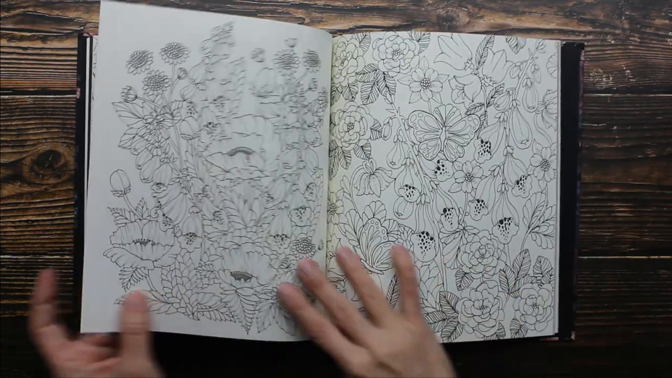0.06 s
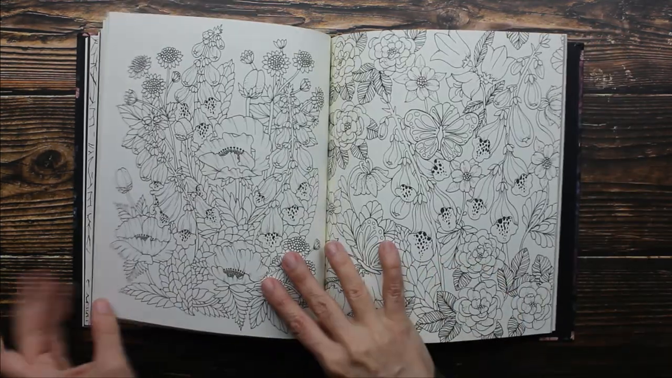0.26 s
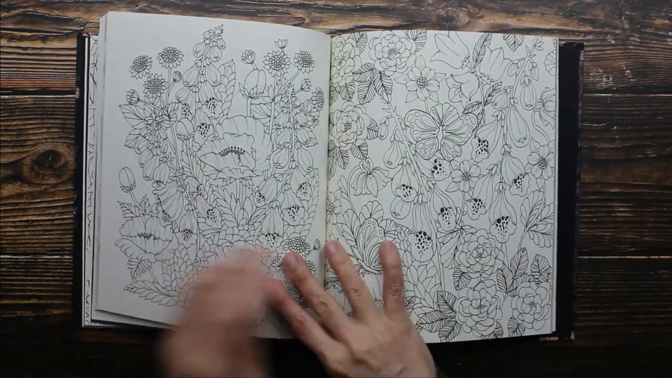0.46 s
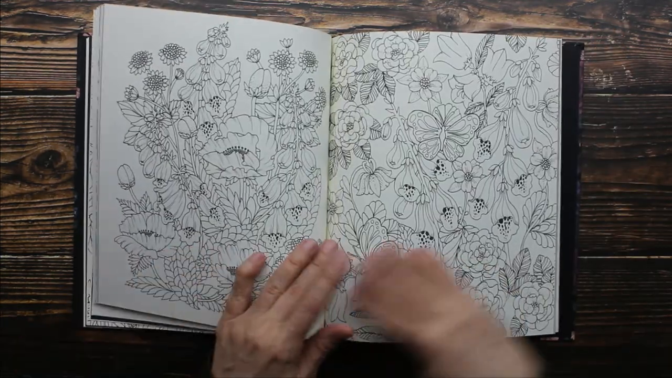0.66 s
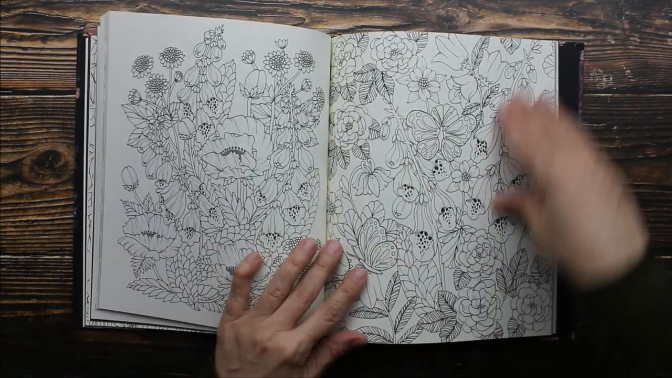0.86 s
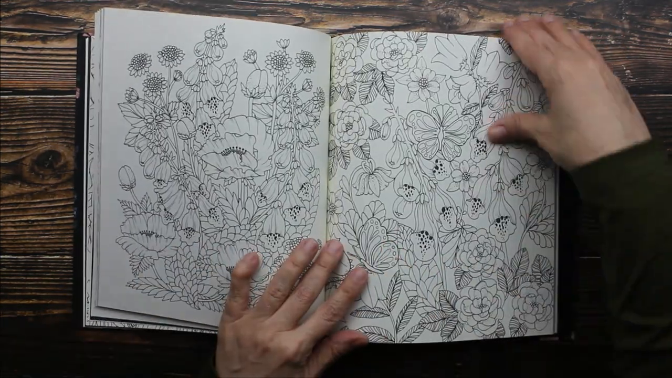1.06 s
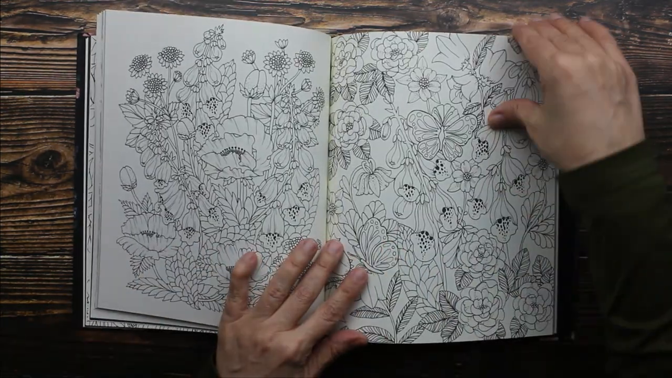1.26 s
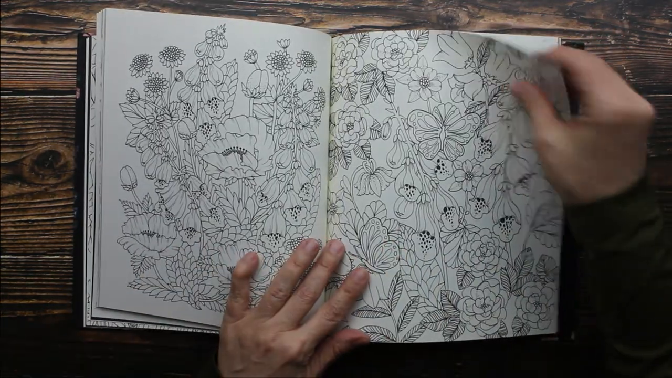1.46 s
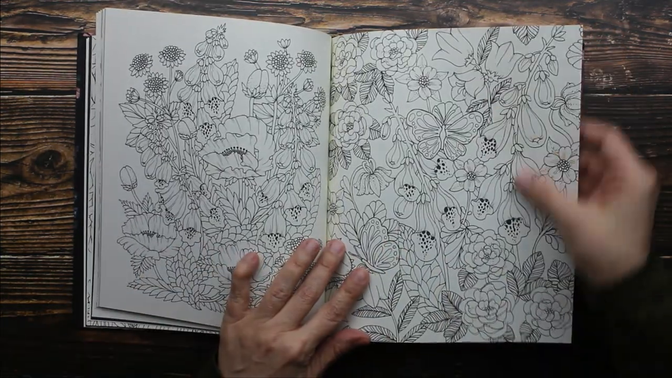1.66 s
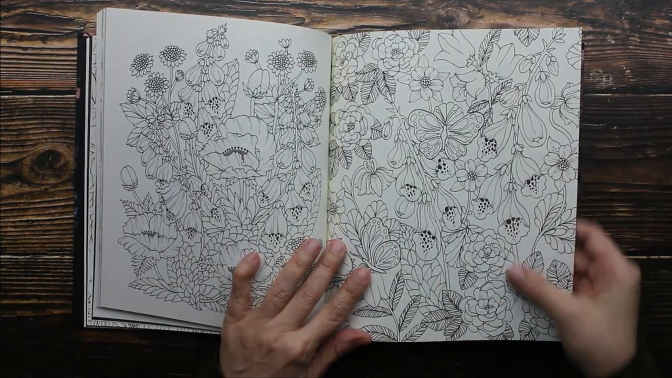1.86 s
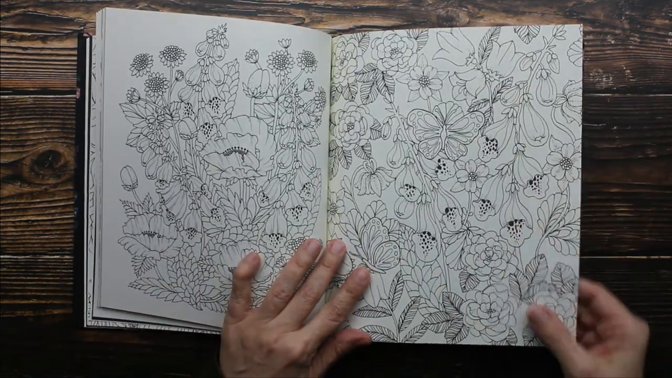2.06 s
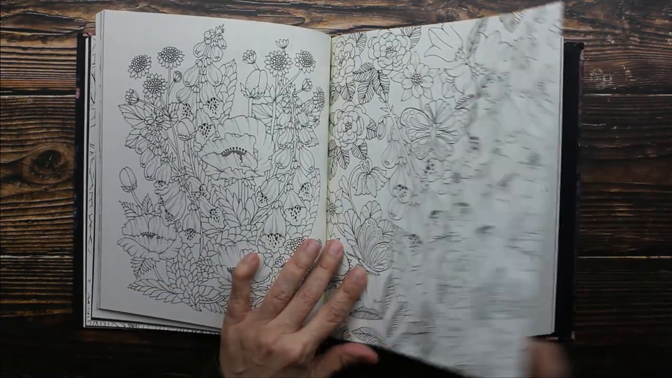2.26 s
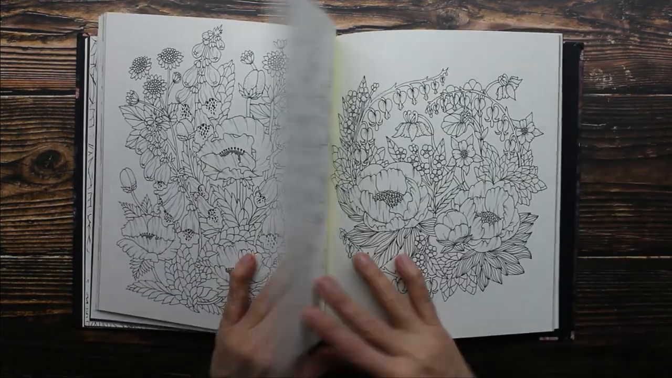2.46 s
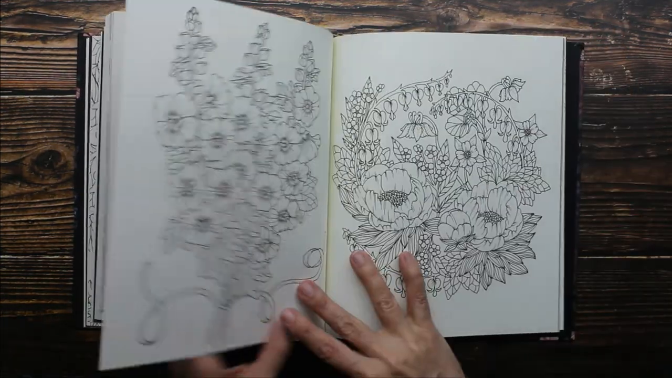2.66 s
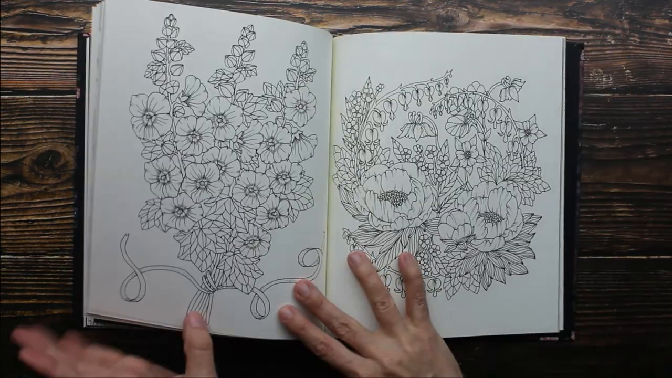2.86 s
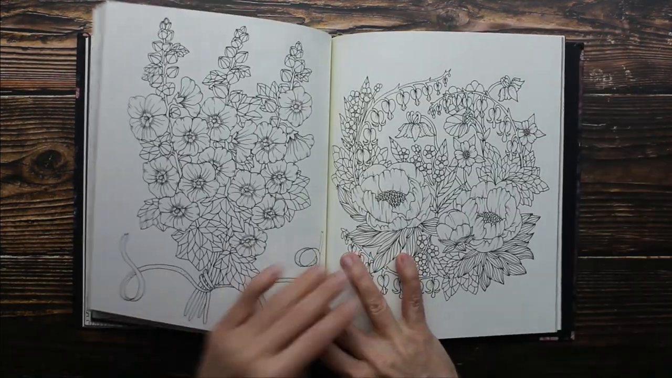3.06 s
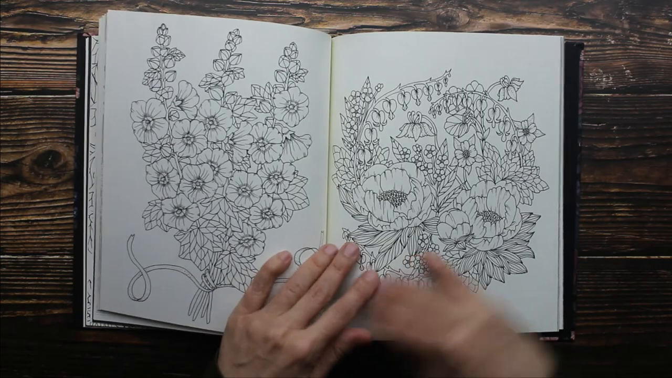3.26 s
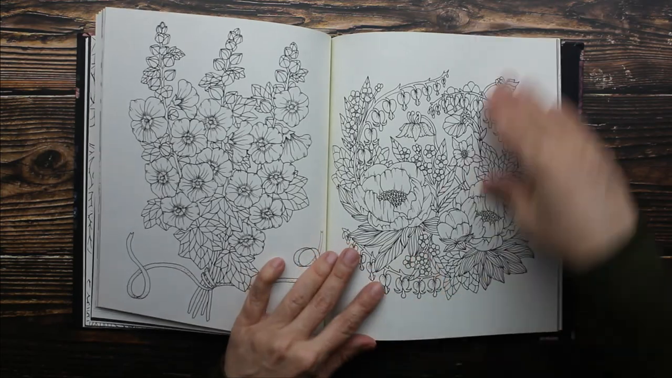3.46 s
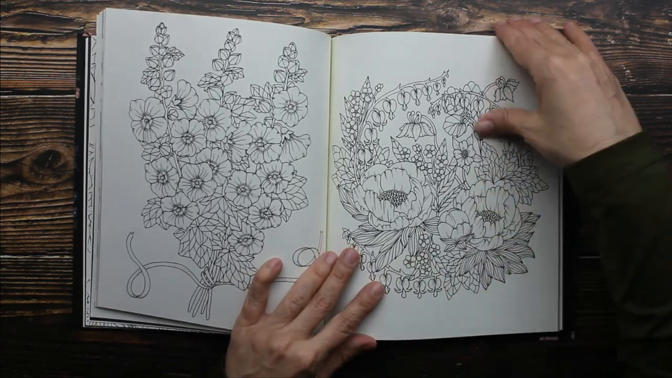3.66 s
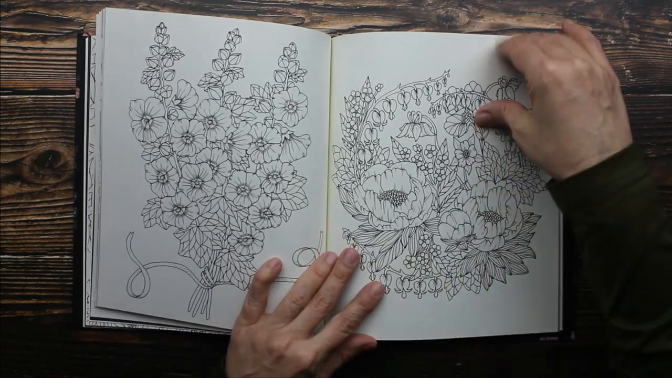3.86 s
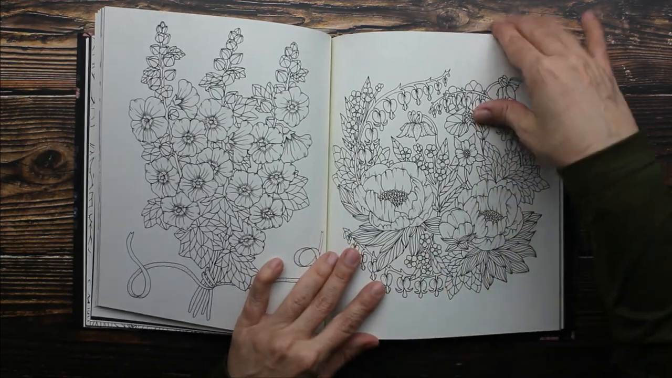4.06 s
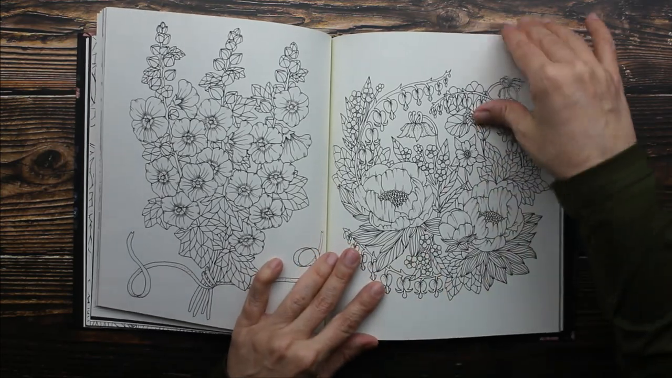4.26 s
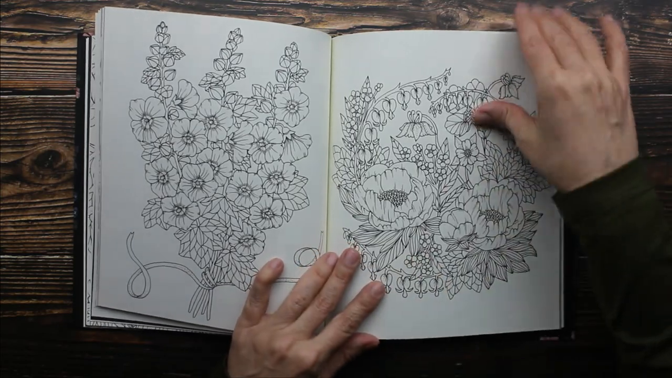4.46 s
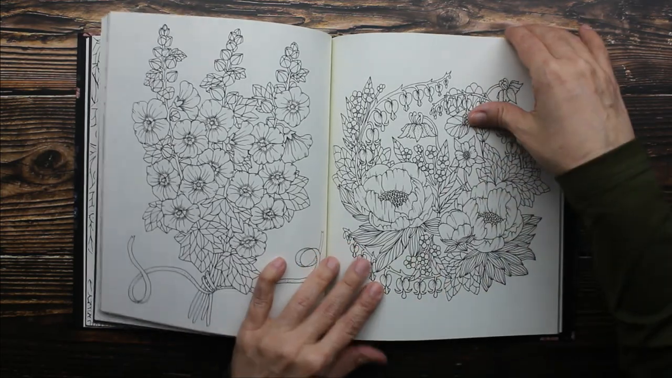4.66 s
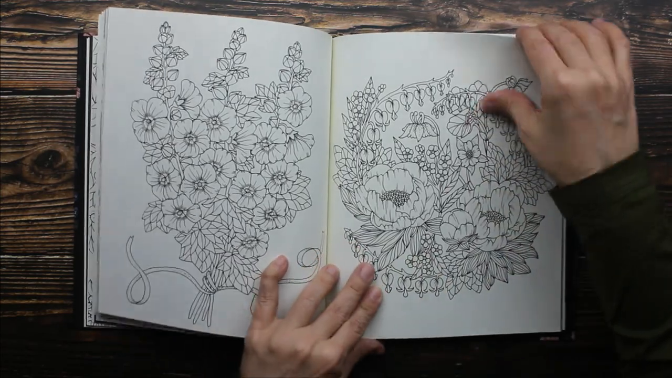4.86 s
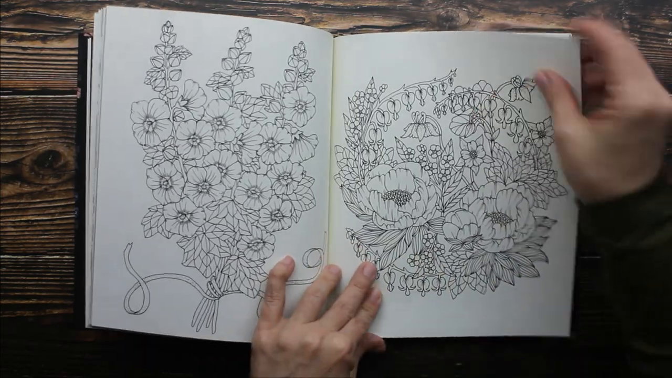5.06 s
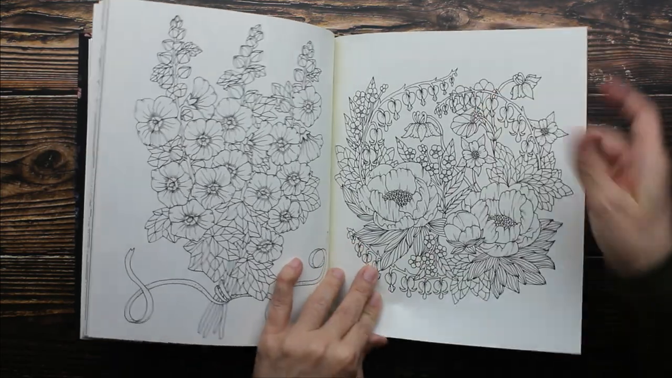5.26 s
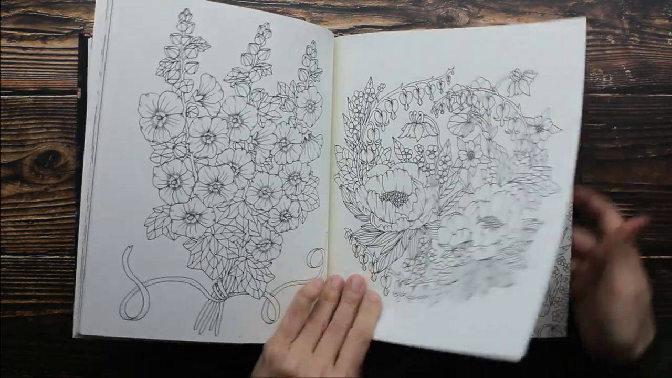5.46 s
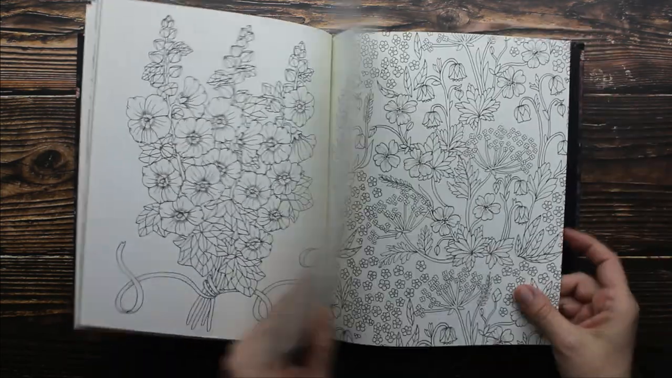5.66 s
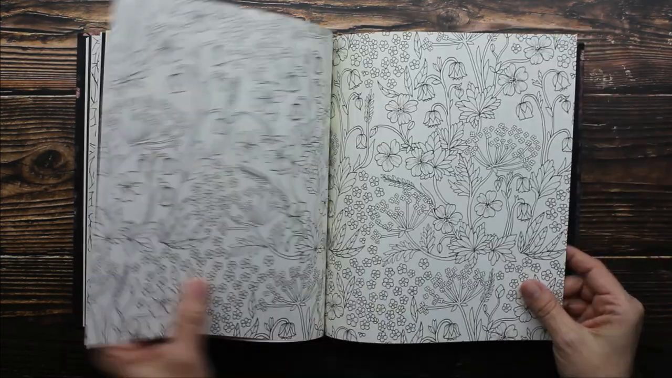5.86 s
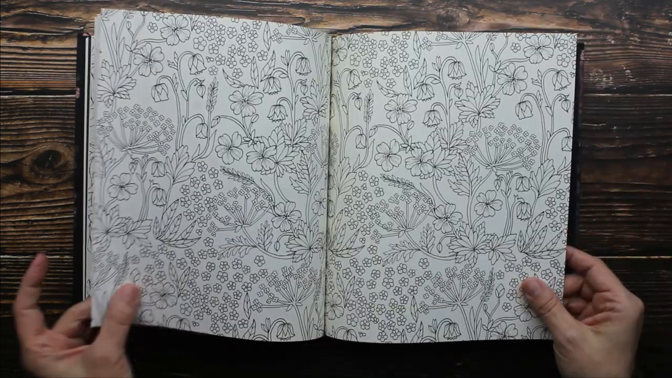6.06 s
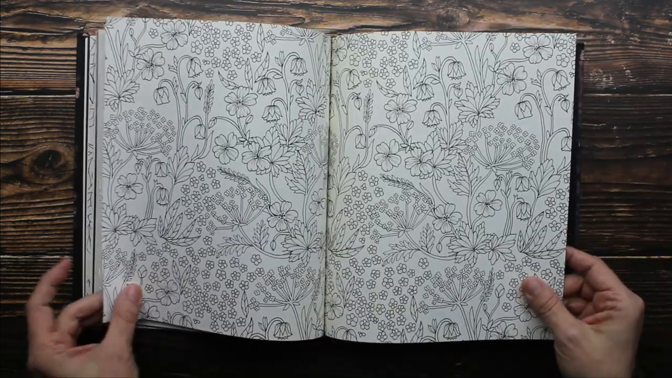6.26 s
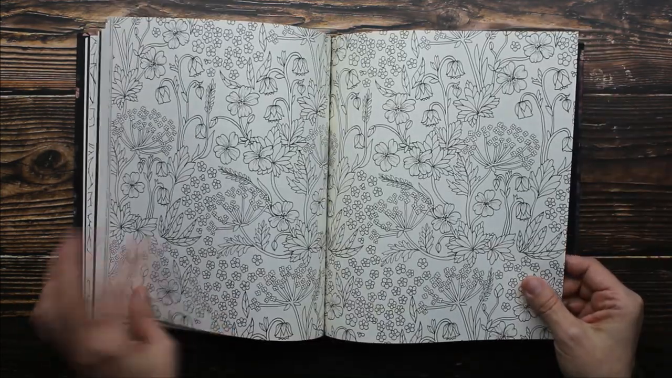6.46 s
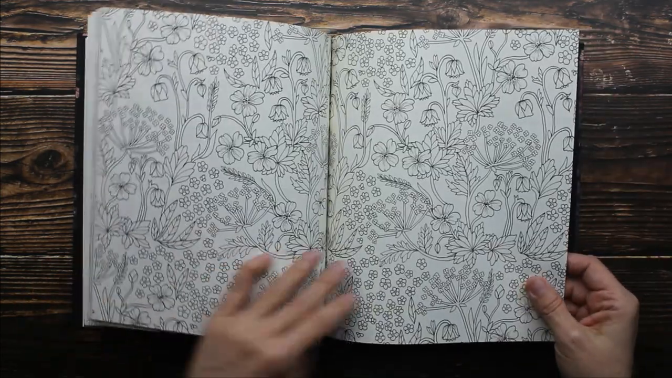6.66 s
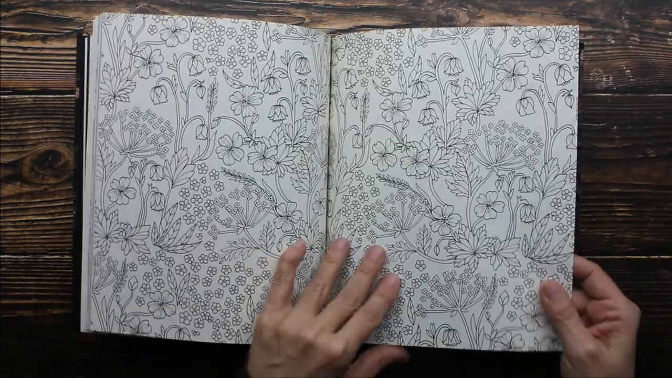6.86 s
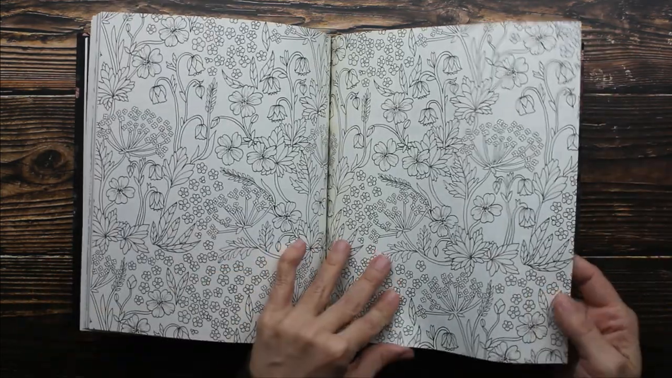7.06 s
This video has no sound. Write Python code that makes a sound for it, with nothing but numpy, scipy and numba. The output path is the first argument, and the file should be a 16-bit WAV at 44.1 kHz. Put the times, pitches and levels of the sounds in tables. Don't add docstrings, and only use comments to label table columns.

```python
import sys
import numpy as np
from scipy import signal
from scipy.fft import rfft, irfft, next_fast_len
from scipy.io import wavfile
from scipy.ndimage import uniform_filter1d
from numba import njit

SR = 44100
rng = np.random.default_rng(int(sys.argv[2]) if len(sys.argv) > 2 else 0)


def voltage_ratio(level):
    return 10 ** (np.asarray(level, float) / 20)


def master_out(mix):
    frames = np.transpose(np.atleast_2d(mix))
    ceiling = np.clip(frames, -1, 1)
    pcm = np.round(ceiling * 32767).astype(np.int16)
    wavfile.write(sys.argv[1], SR, pcm)


N = 313110


def rms_one(x):
    return x / np.sqrt(np.mean(x ** 2) + 1e-20)


def coloured(x, points):
    size = next_fast_len(len(x))
    hz, db = np.transpose(points)
    log_hz = np.log(np.maximum(np.fft.rfftfreq(size, 1 / SR), 1))
    gain = voltage_ratio(np.interp(log_hz, np.log(hz), db))
    return irfft(rfft(x, size) * gain, size)[:len(x)]


def band(x, low_hz, high_hz):
    return signal.sosfilt(signal.butter(2, [low_hz, high_hz], "band", fs=SR, output="sos"), x)


def drift(rate_hz):
    r = np.exp(-80 * np.pi * rate_hz / SR)
    chance = rng.standard_normal(N // 40 + 2002)
    slow = signal.lfilter([1], [1, -2 * r, r * r], chance)[2000:]
    return np.interp(np.arange(N) / 40, np.arange(len(slow)), rms_one(slow))


@njit
def resonate(x, hz, width_hz, rate):
    y = np.zeros_like(x)
    for i in range(2, len(x)):
        r = np.exp(-np.pi * width_hz[i] / rate)
        push = (1 - r * r) / 2 * (x[i] - x[i - 2])
        y[i] = push + 2 * r * np.cos(2 * np.pi * hz[i] / rate) * y[i - 1] - r * r * y[i - 2]
    return y


def twice(x, hz, width_hz):
    return resonate(resonate(x, hz, width_hz, SR), hz, width_hz, SR)


def evened(x):
    return x / np.sqrt(uniform_filter1d(x ** 2, size=6000) + 1e-12)


def faded(size, length_s, edge):
    along = np.arange(size) / (length_s * SR)
    return np.sin(np.pi / 2 * np.clip(np.minimum(along, 1 - along) / edge, 0, 1)) ** 2


def burst(t60_s, attack_s, chance):
    t = np.arange(len(chance)) / SR
    return chance * (1 - np.exp(-t / attack_s)) * voltage_ratio(-60 * t / max(t60_s, .004))


def add(out, at_s, piece, peak_db):
    i = int(at_s * SR)
    out[i:i + len(piece)] += (voltage_ratio(peak_db) * piece / np.abs(piece).max())[:N - i]


def fibres(per_s, spread_db, flicker_db):
    sizes = voltage_ratio(spread_db * np.minimum(rng.exponential(1, N), 4)) * rng.standard_normal(N)
    clicks = sizes * (rng.random(N) < per_s / SR)
    return rms_one(clicks) * voltage_ratio(flicker_db * (drift(3.4) + drift(50)))


def streaks(x, low_hz, high_hz, count, level_db):
    out = x.copy()
    for centre_hz in np.geomspace(low_hz, high_hz, count):
        hz = centre_hz * voltage_ratio(0.6 * drift(3.0))
        out += voltage_ratio(level_db + 4.5 * drift(4.0)) * resonate(x, hz, .07 * hz, SR)
    return out


def strokes(rows, law):
    t, out = np.arange(N) / SR, np.zeros(N)
    for s, rise_s, fall_s, db in rows:
        near = slice(max(int((s - rise_s) * SR), 0), int((s + fall_s) * SR))
        along = np.where(t[near] < s, (s - t[near]) / rise_s, (t[near] - s) / fall_s)
        speed = np.cos(np.pi / 2 * np.clip(along, 0, 1))
        out[near] += (voltage_ratio(db) * speed ** law) ** 2
    return out


def summed_db(rest_db, *powers):
    return 10 * np.log10(voltage_ratio(rest_db) ** 2 + sum(powers))


# frequency in Hz, density in dB per Hz.
AIR_COLOUR = [(15, -32), (25, 7.5), (55, 10.5), (96, 1), (178, 3), (274, -1), (648, -5), (1410, -22),
              (2630, -15), (5280, -35), (8580, -42), (11500, -39), (14000, -26), (15500, -43)]
AIR_DB, HUM_DB = -55.5, -61
HUM_HZ, HUM_WANDER_HZ = 49, 2.5


def room_tone():
    hum_hz = HUM_HZ + HUM_WANDER_HZ * drift(2.8)
    hum = np.sin(2 * np.pi * np.cumsum(hum_hz) / SR) * voltage_ratio(0.4 * drift(9.0))
    air = rms_one(coloured(rng.standard_normal(N), AIR_COLOUR))
    return voltage_ratio(AIR_DB) * air + voltage_ratio(HUM_DB) * rms_one(hum)


ROOM_T60_S, ROOM_WET_DB = 0.26, -17.5


def room(x):
    t = np.arange(SR // 2) / SR
    tail = band(rng.standard_normal(len(t)), 55, 2400) * voltage_ratio(-60 * t / ROOM_T60_S) * (t > .004)
    return voltage_ratio(ROOM_WET_DB) * signal.fftconvolve(x, tail / np.sqrt(np.sum(tail ** 2)))[:N]


# start in seconds, peak in dB, note in Hz, t60 in seconds.
KNOCKS = [(0.779, -36.5, 80.7, 0.37), (2.315, -46, 151, 0.18), (2.49, -37, 205, 0.13),
          (2.832, -36.5, 190, 0.17), (3.152, -37, 70, 0.58), (3.459, -35, 189, 0.11),
          (4.157, -42, 141, 0.17), (4.992, -40.5, 250, 0.27), (5.872, -28.5, 232, 0.2),
          (6.405, -36, 149, 0.085), (6.558, -47, 136, 0.1)]


def thuds():
    out, flat = np.zeros(N), np.ones(12000)
    chance = rng.standard_normal((len(KNOCKS), len(flat)))
    for (s, peak_db, hz, t60_s), noise in zip(KNOCKS, chance):
        push = band(burst(t60_s, 0.001, noise), 34, 310)
        add(out, s, resonate(push, hz * flat, 0.51 * hz * flat, SR), peak_db)
    return out


# middle in seconds, half length in seconds, level in dB.
PAGE_CREAKS = [
    (0.0, 0.4, -53),
    (2.53, 0.15, -52),
    (2.87, 0.04, -43),
    (3.45, 0.4, -55.5),
    (4.7, 0.22, -52),
    (4.96, 0.5, -52.5),
    (5.56, 0.44, -47),
    (7.02, 0.25, -50),
]
# middle in seconds, half length in seconds, level in dB.
HAND_LEANS = [(0.0, 0.28, -58), (.63, 0.16, -53), (0.787, 0.16, -51), (2.502, 0.26, -58),
              (2.848, 0.058, -54), (3.166, 0.076, -49), (3.484, 0.1, -47), (4.8, 0.082, -50),
              (5.023, 0.045, -41.5), (5.567, 0.72, -56.5), (5.893, .08, -46.5), (6.41, 0.12, -63),
              (6.573, 0.059, -44), (6.622, 0.029, -40), (6.68, 0.12, -52), (6.974, 0.11, -54)]
PRESS_LAW = 2.6
REST_FLEX_DB, FLEX_RE_DRAG_DB, REST_TABLE_DB = -57.5, -14.5, -60


def pressing():
    creaks, leans = (strokes([(s, half_s, half_s, db) for s, half_s, db in rows], PRESS_LAW)
                     for rows in (PAGE_CREAKS, HAND_LEANS))
    dragged = voltage_ratio(sliding()[1] + FLEX_RE_DRAG_DB) ** 2
    return summed_db(REST_FLEX_DB, creaks, dragged), summed_db(REST_TABLE_DB, leans)


TABLE_HZ, TABLE_WIDTH_HZ = 131.3, 4.3


def bending():
    flex_db, table_db = pressing()
    creak = fibres(per_s=4000, spread_db=1.5, flicker_db=1.6)
    note_hz = 590 * voltage_ratio(.8 * drift(5))
    flex = rms_one(resonate(creak, note_hz, .25 * note_hz, SR) + voltage_ratio(-5.0) * band(creak, 260, 1200))
    weight, flat = fibres(per_s=630, spread_db=5.0, flicker_db=1.0), np.ones(N)
    table = resonate(weight, TABLE_HZ * flat, TABLE_WIDTH_HZ * flat, SR)
    table = table + voltage_ratio(-9.0) * band(weight, 44, 210)
    return voltage_ratio(flex_db) * flex + voltage_ratio(table_db) * evened(table)


# start in seconds, length in seconds, level in dB, centre in Hz, width re centre.
SINGING = [(0.01, 0.2, -37.5, 7000, 0.3), (0.048, 0.29, -50, 2800, 0.21), (-.04, 0.12, -42.5, 1670, 0.42),
           (-.04, 0.099, -45, 2900, 0.22), (.12, .2, -52, 4250, 0.43), (1.432, 0.034, -35, 7240, 0.12),
           (1.451, 0.065, -38, 7200, 0.28), (1.424, 0.073, -41, 5000, 0.19), (1.497, 0.37, -41, 2160, 0.73),
           (1.98, 0.16, -46.5, 5700, 0.19), (2.207, 0.26, -47.5, 3000, 0.26), (2.556, 0.2, -50, 2180, 0.18),
           (2.57, 0.15, -40, 5400, 0.43), (3.706, 0.12, -49, 3470, 0.44), (5.072, 0.072, -51, 1850, 0.17),
           (5.486, 0.048, -41, 3000, 0.8), (5.529, 0.061, -39.5, 2770, 0.18),
           (5.548, .037, -41, 7340, 0.07), (5.587, 0.029, -39, 7400, .07), (5.483, 0.045, -41, 3730, 0.082),
           (5.733, 0.09, -41, 6040, 0.14), (5.792, 0.072, -42, 2170, 0.31), (2.076, 0.061, -54, 1440, .5),
           (5.62, .03, -44, 6700, 0.27), (5.92, 0.28, -46, 2770, 0.21), (5.957, 0.23, -34, 7550, 0.38),
           (6.55, 0.031, -45, 2400, 0.48), (6.584, 0.036, -45, 2600, 0.58),
           (6.628, 0.094, -43.5, 2440, 0.65), (6.733, 0.064, -43, 2170, 0.46),
           (6.817, 0.13, -48, 2620, 0.55), (6.636, 0.082, -46, 8400, 0.36), (6.763, 0.037, -46, 8000, .3),
           (6.852, 0.13, -49, 9350, .2), (6.95, 0.16, -43.5, 1290, 0.62), (6.984, 0.12, -43, 3370, 0.38)]
AIR_SCUFFS = [(1.35, 0.14, -49, 554, 1.2), (2.212, 0.058, -51.5, 330, 0.76), (2.544, 0.11, -49, 302, 0.45),
              (2.698, 0.094, -39, 333, 1.56), (2.828, 0.011, -29, 1270, 0.41),
              (2.84, 0.048, -38, 1500, 0.6), (3.843, 0.056, -52.5, 8300, 0.91), (3.75, .05, -56, 13000, .3),
              (4.147, 0.064, -58, 9500, .4), (4.16, 0.048, -50.5, 3000, .6), (4.812, .02, -56, 6000, .15),
              (4.855, .015, -54, 6200, .15), (4.989, 0.0094, -34, 623, 0.37), (2.828, 0.049, -36.5, 457, 1),
              (2.855, 0.034, -47, 1200, 1), (3.825, 0.022, -41, 980, 2.2), (4.281, 0.021, -38, 910, 3.8),
              (4.282, 0.019, -37, 5270, 1.9), (4.933, 0.037, -44.5, 4800, 0.89),
              (4.95, 0.031, -48, 4000, .9), (5.501, 0.022, -37, 540, 0.87), (5.557, 0.022, -37, 590, 1.3),
              (5.601, 0.014, -40, 543, 0.82), (5.864, 0.031, -31, 600, 2.9), (5.89, 0.031, -34, 450, 0.81),
              (6.938, 0.02, -39, 1100, 1.1), (6.539, 0.052, -41.5, 141, 0.53),
              (6.605, 0.028, -50, 137, 0.79)]
# start in seconds, length in seconds, level in dB, first centre in Hz, last centre in Hz.
SHEET_GLIDES = [(0.142, 0.14, -44.5, 7000, 7900), (1.38, 0.1, -37.5, 3280, 4100),
                (1.456, .06, -38.5, 3700, 4800), (1.906, 0.14, -46, 2400, 3000),
                (2.018, 0.079, -50.5, 2900, 2600), (4.948, .04, -42, 5000, 3500),
                (4.998, 0.054, -41, 3300, 2300), (5.476, 0.058, -39, 4970, 4900),
                (5.585, 0.1, -39, 2960, 4400), (6.24, 0.036, -61, 2750, 2800),
                (6.36, .045, -45, 7000, 4300), (6.878, 0.075, -45, 1990, 1900), (7.0, 0.1, -49, 3200, 4600)]
PATCH_EDGE, SCUFF_EDGE = 0.33, 0.24
GLIDE_WIDTH = 0.36


def swells():
    out, grit = np.zeros(N), fibres(per_s=12000, spread_db=2.0, flicker_db=1.5)
    patches = [(*row, PATCH_EDGE) for row in SINGING] + [(*row, SCUFF_EDGE) for row in AIR_SCUFFS]
    for s, length_s, level_db, hz, width, edge in patches:
        i = np.arange(int(s * SR), min(int((s + length_s) * SR), N))
        reach = np.sqrt(1 + width ** 2 / 4) + width / 2
        piece = band(band(grit[i], hz / reach, hz * reach), hz / reach, hz * reach)
        piece = voltage_ratio(level_db) * faded(len(i), length_s, edge) * rms_one(piece)
        out[i[i >= 0]] += piece[i >= 0]
    for s, length_s, level_db, from_hz, to_hz in SHEET_GLIDES:
        i = np.arange(int(s * SR), min(int((s + length_s) * SR), N))
        hz = np.geomspace(from_hz, to_hz, int(length_s * SR) + 2)[:len(i)]
        piece = rms_one(twice(grit[N - 1 - i], hz, GLIDE_WIDTH * hz))
        out[i] += voltage_ratio(level_db) * faded(len(i), length_s, PATCH_EDGE) * piece
    return out


SNAP, SNAP_S = 4.1, 0.00004
# start in seconds, peak in dB, note in Hz, width re note.
PAPER_SNAPS = [(1.3625, -38, 3500, .6), (1.37, -30, 2500, .6), (1.379, -32, 2500, .6), (1.393, -31, 2000, 0.9),
               (1.4654, -21, 3200, 0.2), (1.52, -29, 1000, 1.6), (1.545, -24, 8500, .2), (2.727, -34, 1400, .5),
               (2.73, -29, 1110, 0.54), (2.735, -31, 1300, 0.37), (2.7475, -31, 900, 0.68),
               (2.8297, -25, 2800, 0.29), (2.8286, -24, 497, 0.68), (2.835, -28, 2300, 0.53),
               (2.863, -26, 2680, 0.3), (3.1509, -27.5, 1660, 0.74), (2.202, -38, 600, .9),
               (4.202, -42, 8000, .9), (4.2745, -36, 9000, .5), (4.471, -51, 2650, 0.035),
               (4.567, -50, 2650, .04), (4.8895, -36, 4500, .9), (4.861, -34, 795, 0.23),
               (4.8676, -30, 4000, .7), (4.874, -34, 1370, 0.46), (4.884, -40, 700, 0.35),
               (4.895, -35, 660, .3), (4.9055, -36, 680, 0.28), (4.911, -37, 1800, .3),
               (4.9883, -13.5, 5450, 0.26), (4.9949, -22.5, 930, 0.3), (5.5005, -26, 2900, .4),
               (5.5061, -25, 1500, .8), (5.517, -32, 900, 0.61), (5.556, -29, 1200, 0.78),
               (5.559, -26, 2800, 0.54), (5.5645, -28, 4000, .6), (5.6021, -22, 2300, 1.1),
               (5.8834, -18, 423, 0.9), (6.242, -31, 2100, 0.99), (6.4058, -32, 2970, 0.17),
               (6.4055, -27, 6950, 0.12), (6.411, -20, 446, 0.6), (6.4165, -45, 3000, .05),
               (6.546, -35, 2500, 1), (6.593, -29, 2000, .9), (6.92, -34, 2000, .6), (6.942, -27, 1240, 0.48),
               (2.7133, -36, 417, .25), (2.759, -40, 450, .5), (2.8472, -25.5, 600, 1.0),
          (2.8575, -21, 1100, 0.8), (2.86, -28, 1990, 0.36), (2.867, -29, 1400, 0.43),
          (2.8714, -29, 1500, 0.27), (2.8747, -29, 1280, 0.45), (2.88, -35, 1200, 0.37),
          (2.887, -30, 800, 0.88), (2.893, -43, 1200, .5), (2.902, -38, 700, .6), (3.834, -25, 7300, 0.19),
          (3.8342, -35, 3300, 0.22), (3.836, -36, 1620, .3), (3.8375, -37, 3100, .3),
          (4.283, -31, 5000, .6), (4.2873, -28.5, 2200, 0.39), (4.291, -30, 9700, .08),
          (4.295, -42, 2320, .2), (4.8694, -31, 1260, 0.2), (4.9893, -18, 670, 0.32),
          (5.51, -32, 540, 0.54), (5.568, -30, 586, 0.59), (5.8695, -21, 600, 0.99),
          (5.8768, -25, 1210, .4), (5.8861, -12.5, 1330, 0.42), (5.889, -18, 2190, 0.36),
          (5.8905, -19.5, 527, 0.46), (5.905, -26, 606, 0.52), (5.914, -27, 446, 0.65),
          (5.923, -30, 480, .6), (6.404, -29, 1600, 0.24), (6.404, -30, 5300, .15), (6.406, -37, 3700, .15)]


def ticks():
    out, flat = np.zeros(N), np.ones(1500)
    snap = np.exp(-np.arange(len(flat)) / (SNAP_S * SR))
    for s, peak_db, hz, width in PAPER_SNAPS:
        add(out, s, twice(snap, hz * flat, width * hz * flat), peak_db)
    return out


# start in seconds, peak in dB, page note in Hz, crack in dB re peak.
CORNER_POPS = [(0.2595, -35, 2720, 4.5), (0.782, -33.5, 590, 4.5), (1.464, -25.5, 1930, 5),
               (1.519, -38, 1970, -8), (2.201, -33, 1300, -6), (3.151, -33.5, 570, 4.5),
               (3.221, -35.5, 610, -11), (3.8329, -42, 1660, 19), (5.355, -29, 950, -8),
               (5.603, -42, 2090, 2), (5.868, -30, 610, -4), (5.878, -35, 1290, -5),
               (6.241, -42, 2730, -12), (6.4037, -34, 1580, 12), (6.533, -33.5, 1530, 0),
               (6.949, -25.5, 1150, -7)]
# start in seconds, peak in dB, crack in dB re peak.
THUMB_PICKS = [
    (4.629, -33, -16),
    (4.761, -35, -12),
    (4.812, -33, -5.5),
    (4.854, -34, 0),
    (4.8668, -20.5, -7.5),
    (4.877, -40, -14),
    (4.888, -36, -2),
    (4.9872, -19, 6),
    (5.225, -38, 0),
]
# start in seconds, peak in dB, page note in Hz.
PAGE_SLAPS = [
    (2.729, -31, 515),
    (2.828, -15.5, 1480),
    (2.836, -33, 480),
    (2.846, -28, 510),
    (2.8525, -18.5, 1540),
    (2.855, -25, 1570),
    (5.8855, -29, 1310),
    (5.888, -30, 500),
    (6.409, -25.5, 424),
    (6.9413, -23, 605),
]
POP_T60_S, PICK_T60_S, SLAP_T60_S = 0.088, 0.067, 0.03
CORNER_HZ, CORNER_HZ_PER_DB, SLAP_CRACK_DB = 727, 9, -33


def releases():
    popped = [(*row, POP_T60_S) for row in CORNER_POPS]
    slapped = [(*row, SLAP_CRACK_DB, SLAP_T60_S) for row in PAGE_SLAPS]
    picked = [(s, db, CORNER_HZ + CORNER_HZ_PER_DB * crack_db, crack_db, PICK_T60_S)
              for s, db, crack_db in THUMB_PICKS]
    return sorted(popped + slapped + picked)


# frequency in Hz, density in dB per Hz.
CRACK_SPECTRUM = [(1500, 7.5), (3000, 17), (5500, 10), (9000, 12.5), (12000, 4), (14300, -6), (15500, -22)]


def pops():
    out, flat = np.zeros(N), np.ones(6000)
    snap = SNAP * np.exp(-np.arange(len(flat)) / (SNAP_S * SR))
    chance = rng.standard_normal((len(releases()), 2, len(flat)))
    for (s, peak_db, hz, crack_db, t60_s), (low, high) in zip(releases(), chance):
        at_s = s + 0.000853
        push = burst(0.79 * t60_s, 0.00032, low) + snap
        add(out, at_s, twice(push, hz * flat, .42 * hz * flat), peak_db)
        body = band(burst(t60_s, 0.0006, low[::-1]), 0.34 * hz, hz + 1100)
        add(out, at_s, band(body, 0.27 * hz, hz + 1400), peak_db - 6.5)
        crack = burst(.55 * t60_s, .0002, coloured(high, CRACK_SPECTRUM))
        add(out, at_s, crack, peak_db + crack_db)
    return out


# middle in seconds, half length in seconds, hiss in dB, drag in dB.
HAND_SHIFTS = [(0.214, 0.15, -43.5, -47.5), (.359, 0.033, -75, -73), (0.578, 0.13, -47, -49.5),
               (0.954, 0.35, -50, -49.5), (0.425, 0.027, -69, -56), (1.167, 0.1, -55.5, -56.5),
               (1.282, 0.12, -52.5, -58), (2.087, 0.39, -48, -48), (2.217, 0.073, -60, -49.5),
               (2.534, 0.13, -43.5, -47.5), (2.857, 0.081, -46, -62), (2.967, 0.095, -66, -58),
               (3.038, 0.043, -55.5, -55), (3.647, 0.33, -54.5, -53.5), (3.896, 0.058, -61, -59),
               (4.028, 0.065, -61, -58), (4.165, 0.11, -61, -51.5), (4.301, 0.082, -55, -50.5),
               (4.42, .035, -67, -65), (4.52, 0.11, -57.5, -61), (4.825, 0.099, -57, -52),
               (4.902, 0.045, -71, -46.5), (5.489, 0.18, -48, -41), (6.273, 0.073, -51, -50.5),
               (6.312, .06, -63, -53), (6.475, 0.12, -55, -53.5)]
# fastest at in seconds, speeding up in seconds,
# slowing in seconds, drag in dB, dull drag in dB re drag.
SHEET_SLIDES = [(0.04, 0.36, 0.16, -38, -7.5), (.72, 0.3, 0.23, -47.5, -4), (1.464, .15, 0.16, -41.5, -4),
                (1.6, 0.22, 0.23, -45.5, -3), (1.868, 0.14, 0.13, -42, -3), (2.325, 0.1, 0.11, -49, 2),
                (2.48, 0.28, 0.24, -47, -8), (2.609, 0.056, 0.093, -48.5, 9),
                (2.68, 0.097, 0.25, -43.5, -0.5), (3.153, 0.086, 0.13, -46.5, -7.5),
                (3.43, 0.27, 0.19, -45.5, -5), (3.779, 0.084, 0.11, -48.5, -0.5),
                (4.634, 0.066, 0.2, -48, -2.5), (4.996, 0.08, 0.11, -39.5, -3),
                (5.09, .06, 0.16, -46.5, -3), (5.39, 0.21, 0.24, -48.5, 0.5), (5.6, 0.11, 0.053, -36, -2.5),
                (5.9, 0.35, 0.15, -36, -2), (6.09, 0.28, 0.16, -44.5, -4.5), (6.4, 0.18, 0.077, -48.5, -6),
                (6.573, 0.1, 0.23, -48, 2.5), (6.772, 0.11, 0.17, -43.5, -1), (6.94, 0.13, 0.18, -47, 3),
                (7.09, 0.2, .1, -42, -14)]
SLIDE_LAW, FIDGET_LAW = 1.25, 4.8
REST_DRAG_DB, REST_DULL_DB, FIDGET_DULL_DB = -60, -59.5, -3.5


def sliding():
    shifts = strokes([(s, half_s, half_s, db) for s, half_s, _, db in HAND_SHIFTS], FIDGET_LAW)
    drag = strokes([row[:4] for row in SHEET_SLIDES], SLIDE_LAW)
    dull = strokes([(s, rise_s, fall_s, db + share_db)
                    for s, rise_s, fall_s, db, share_db in SHEET_SLIDES], SLIDE_LAW)
    return (summed_db(REST_DRAG_DB, shifts, drag),
            summed_db(REST_DULL_DB, voltage_ratio(FIDGET_DULL_DB) ** 2 * shifts, dull))


SINGS_ABOVE_DB = -52


def sheet():
    drag_db, dull_db = sliding()
    drag = band(fibres(per_s=16000, spread_db=-1.5, flicker_db=0.8), 1820, 7000)
    dull = band(fibres(per_s=9000, spread_db=-1.5, flicker_db=0.5), 1046, 3070)
    ring_db = -3.0 + np.minimum(drag_db - SINGS_ABOVE_DB, 0)
    drag = evened(streaks(drag, 2730, 4600, count=4, level_db=ring_db))
    dull = evened(streaks(dull, 1200, 2370, count=4, level_db=-7.0))
    return voltage_ratio(drag_db) * drag + voltage_ratio(dull_db) * dull


# fastest at in seconds, speeding up in seconds,
# slowing in seconds, hiss in dB, airy top in dB re hiss.
FINGER_RUBS = [(.095, .4, 0.13, -39.5, -6.5), (.72, 0.19, 0.43, -41.5, -6.5), (.95, .2, 0.2, -44, -6.5),
               (1.452, 0.17, 0.14, -41, -24), (1.58, 0.24, 0.19, -38, -6.5), (1.793, 0.34, 0.28, -32, -10),
               (1.98, 0.16, 0.19, -37, -20), (2.38, 0.2, 0.27, -43.5, -13.5),
               (2.624, 0.1, 0.25, -39.5, -21), (2.76, 0.19, 0.13, -43, -6.5),
               (3.16, 0.096, 0.22, -42.5, -10), (3.49, 0.39, 0.24, -41, -5),
               (3.775, 0.11, 0.12, -48.5, -6.5), (4.639, 0.093, 0.34, -50, -10),
               (4.989, 0.053, 0.14, -42.5, -17), (5.1, 0.2, 0.21, -49.5, -2.5),
               (5.302, 0.41, 0.25, -45.5, -13.5), (5.602, 0.15, 0.39, -33.5, -39),
               (5.83, 0.34, 0.38, -35.5, -11), (6.08, 0.44, 0.16, -35.5, -20),
               (6.398, 0.22, 0.095, -44.5, -18), (6.57, 0.083, 0.36, -41.5, -10),
               (6.78, 0.063, 0.12, -43.5, -15), (7.08, 0.63, .15, -46, -16)]
RUB_LAW = 2.43
REST_HISS_DB, REST_AIR_DB, FIDGET_AIR_DB = -68, -75.5, -11.5
RIDGE_HZ, RIDGE_HZ_PER_DB = 8700, 106


def rubbing():
    shifts = strokes([(s, half_s, half_s, db) for s, half_s, db, _ in HAND_SHIFTS], FIDGET_LAW)
    hiss_db = summed_db(REST_HISS_DB, shifts, strokes([row[:4] for row in FINGER_RUBS], RUB_LAW))
    airy = strokes([(s, rise_s, fall_s, db + air_db)
                    for s, rise_s, fall_s, db, air_db in FINGER_RUBS], RUB_LAW)
    air_db = summed_db(REST_AIR_DB, voltage_ratio(FIDGET_AIR_DB) ** 2 * shifts, airy) - hiss_db
    return hiss_db, RIDGE_HZ + RIDGE_HZ_PER_DB * air_db, air_db


def finger():
    level_db, hz, air_db = rubbing()
    grit = fibres(per_s=26000, spread_db=-2.0, flicker_db=0.85)
    hump = twice(grit, hz, 0.76 * hz) + voltage_ratio(-5.5) * band(grit, 3900, 9900)
    hiss = evened(streaks(hump, 4470, 9800, count=4, level_db=-6.0))
    air = rms_one(band(grit[::-1], 6800, 12300))
    return voltage_ratio(level_db) * hiss + voltage_ratio(level_db + air_db + 3.5) * air


# frequency in Hz, gain in dB.
MIC_RESPONSE = [(20, -6), (60, -2.5), (8500, -0.5), (10500, -2), (12500, -5.5), (15500, -10)]


def scene():
    book = finger() + sheet() + bending() + swells() + pops() + ticks() + thuds()
    heard = coloured(book + room(book), MIC_RESPONSE) + room_tone()
    return np.array([heard, heard])


def band_limit(x):
    return signal.sosfilt(signal.butter(12, 15720, fs=SR, output="sos"), x)


# middle in seconds, level in dB, low edge in Hz, high edge in Hz.
SIDE_BANDS = [
    (2.525, -52, 5230, 6860),
    (2.525, -70, 13800, 15200),
    (5.683, -42, 4700, 6200),
    (5.683, -54, 10400, 12200),
    (6.872, -58, 8900, 11000),
    (6.873, -70, 12400, 13930),
]
SIDE_S = .046


def record(dry):
    apart, white = np.zeros(N), rng.standard_normal(N)
    for s, level_db, low_hz, high_hz in SIDE_BANDS:
        i = np.arange(int((s - SIDE_S / 2) * SR), int((s + SIDE_S / 2) * SR))
        piece = rms_one(band(band(white[i], low_hz, high_hz), low_hz, high_hz))
        apart[i] += voltage_ratio(level_db) * faded(len(i), SIDE_S, .5) * piece
    return band_limit(dry + apart * [[1], [-1]])


dry = scene()
out = record(dry)
master_out(out)
```